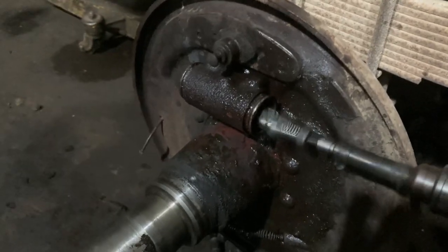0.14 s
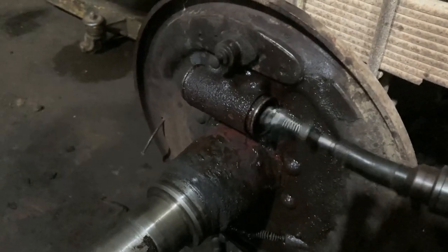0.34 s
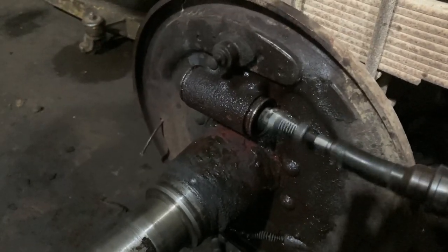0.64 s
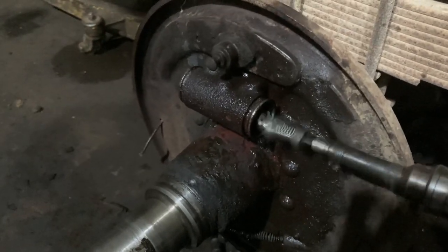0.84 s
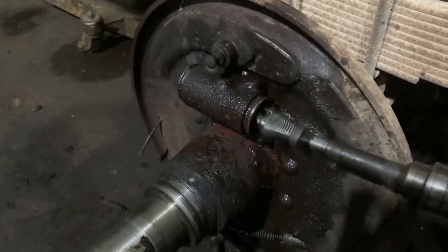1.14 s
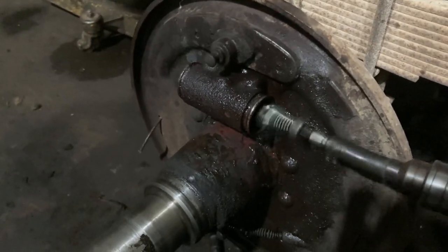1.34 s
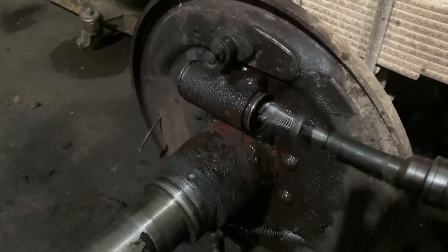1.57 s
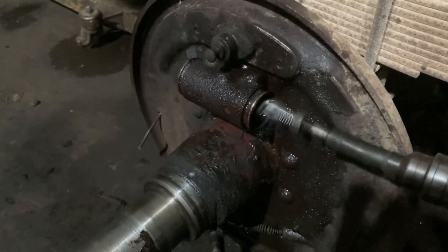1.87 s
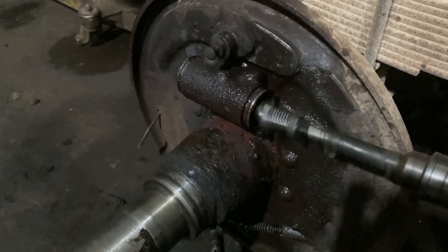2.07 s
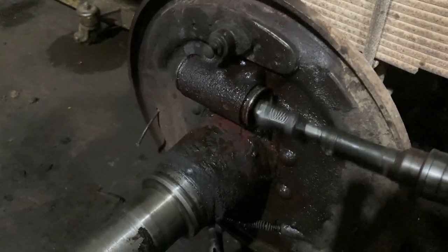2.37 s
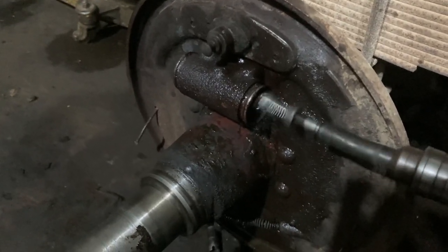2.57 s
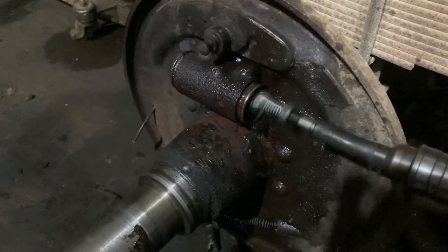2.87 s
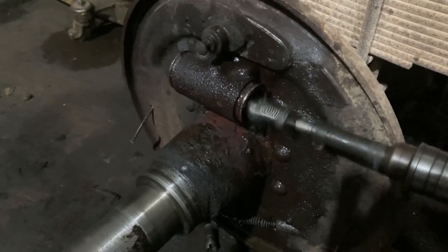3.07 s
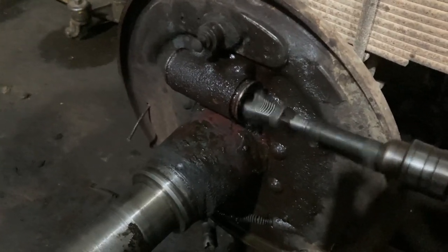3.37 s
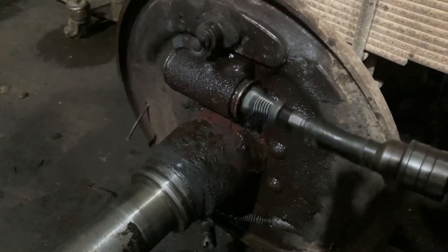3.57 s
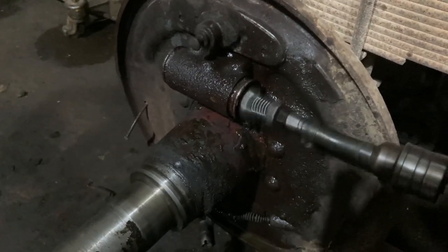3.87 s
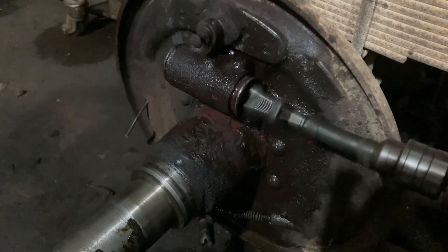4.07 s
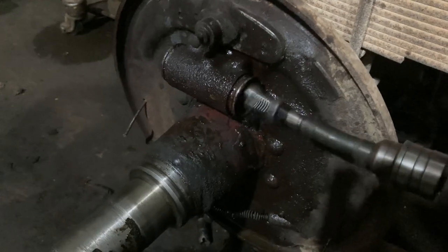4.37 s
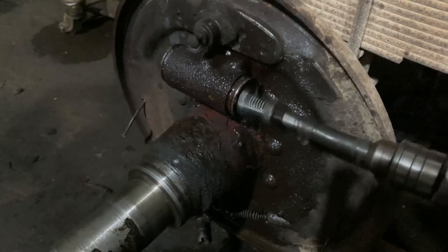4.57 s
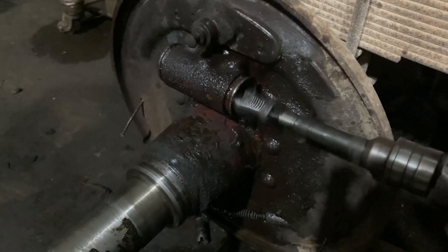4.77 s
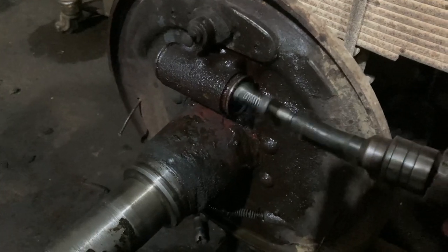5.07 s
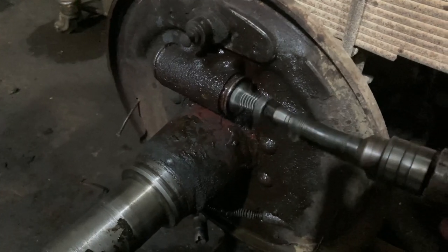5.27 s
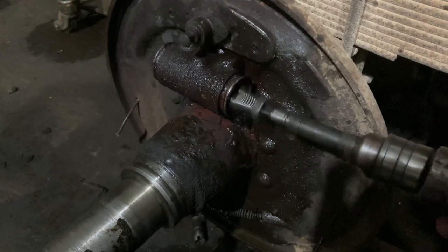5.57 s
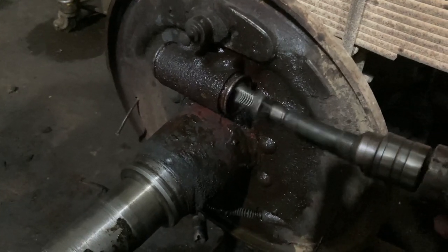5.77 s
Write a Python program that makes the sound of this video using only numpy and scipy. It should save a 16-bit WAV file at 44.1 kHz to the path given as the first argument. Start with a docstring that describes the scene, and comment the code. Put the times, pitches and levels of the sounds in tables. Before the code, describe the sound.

In a garage, a power drill spins a cleaning tool in a metal brake cylinder. A steady, buzzy whine around 1500 hertz sits over lower motor tones, rushing fan air and bright hiss. A faint crisp tick peaks just after one second. From about four seconds the brush catches and scrapes with short metallic chatter, busier after five. Close stereo microphone, dry, with the whine leaning left at first.

```python
"""Inside a metal brake cylinder a power drill spins a cleaning brush, close to a two-port microphone.
Motor: sines at multiples of rotor speed, which sags a little under load.
Fan, commutator and bristles: shaped stereo noise that rushes, hisses and fizzes.
Brush: noise bursts tick once a chuck turn; random slips and later catches ring the bore modes."""
import sys
import numpy as np
from scipy import signal
from scipy.fft import rfft, irfft, next_fast_len
from scipy.io import wavfile
from scipy.ndimage import map_coordinates

SR = 44100
rng = np.random.default_rng(int(sys.argv[2]) if len(sys.argv) > 2 else 0)


def wav_out(sig):
    """Save sig, one row per channel (or a flat mono array), as 16-bit PCM at SR to the path in sys.argv[1]."""
    wavfile.write(sys.argv[1], SR, np.round(np.clip(np.atleast_2d(sig).T, -1, 1) * 32767).astype(np.int16))


N = 260840

# rotor speed, sagging as the brush loads the motor: time_s, speed_hz
ROTOR_SPEED = [(0, 126.31), (0.25, 126.11), (0.42, 125.67), (0.68, 126.14), (0.9, 125.83), (1.12, 125.11),
               (1.25, 125.51), (1.37, 125.29), (1.5, 125.84), (1.75, 125.57), (1.88, 125.92), (2.0, 125.65),
               (2.12, 125.21), (2.31, 126.53), (2.52, 125.94), (2.63, 125.38), (2.95, 125.03),
               (3.03, 124.8), (3.13, 125.13), (3.4, 125.02), (3.52, 124.06), (3.8, 124.32), (3.87, 124.63),
               (3.98, 124.14), (4.08, 124.42), (4.2, 123.99), (4.42, 124.91), (4.6, 124.47), (4.77, 124.92),
               (5.0, 124.72), (5.33, 124.23), (5.55, 124.66), (5.68, 124.25), (5.91, 124.41)]
# main whine, 12 pulses a rotor turn: time_s, level_db, left_minus_right_db
WHINE_SWELL = [(0, -30, 8), (0.2, -29.5, 7), (0.42, -26.5, 6), (0.68, -28.5, 6), (1.05, -25, 2.1),
               (1.35, -25.2, 1.9), (1.55, -27, 5.5), (1.73, -26.2, 4.5), (1.92, -27.5, 6.5),
               (2.12, -25.5, 3.4), (2.31, -30.9, 7.6), (2.52, -28, 5), (2.68, -26, 3.1), (3.03, -26.7, 0.5),
               (3.4, -26.5, 0.7), (3.75, -26.5, 1), (4.2, -27, 1), (4.45, -26.5, 0.5), (5.0, -26.5, 0.2),
               (5.91, -26.5, 1)]
# strong motor partials at slow, usual and fast rotor speed: rotor_multiple, slow_db, usual_db, fast_db,
# slow_left_minus_right_db, fast_left_minus_right_db, left_lead_rad, waver_db
STRONG_PARTIALS = [(4, -34.5, -34, -36, -8.5, -4, 0.24, 0.16), (8, -37, -35, -36.5, -2.7, -1, 2.5, 0.76),
                   (16, -52.5, -55.5, -47, -3, 0, -1.92, 2), (20, -35, -33.5, -36, -3.5, 0.5, -2, 1.04),
                   (24, -38.5, -33, -37, .5, -2.9, 1.49, 0.99), (25, -53, -55, -49.5, -12.5, 4.5, -3, 3),
                   (28, -49.5, -49, -49.5, -9.5, -1.5, 3, 0.5), (33, -54, -54.5, -54, -3, 3.5, -1.5, 2.5),
                   (36, -46, -42, -48.5, 2, 21.5, 2.5, 1), (39, -62.6, -53, -47.5, 4.5, -1.5, -3, -0.5),
                   (40, -54, -53, -52, -7.5, 2.5, -2.5, 2), (41, -56, -57.5, -48, -2, -5, -4, -1),
                   (44, -48.5, -45.5, -49, -6.5, 1.9, -3, 2.7), (60, -62.5, -60.5, -52, -3, 1.5, 2.7, 4),
                   (80, -53.5, -56.5, -60.5, 0, -2.5, 1.5, 3)]
# faint motor partials, before the port response: rotor_multiple, level_db
FAINT_PARTIALS = [(1, -80), (2, -65.5), (3, -63.5), (6, -67.5), (9, -53.5), (11, -45), (13, -68.5),
                  (17, -56.5), (18, -63.5), (19, -47), (23, -51.5), (26, -57), (29, -57.5), (30, -59),
                  (31, -52), (32, -55), (35, -60.5), (42, -54.5), (45, -52), (48, -56), (49, -54.5),
                  (56, -60), (64, -51), (65, -55), (69, -54.5), (72, -57.5), (78, -53)]
# brush catching in the bore: time_s, level_db
BRUSH_CATCHES = [(3.9901, -34), (4.054, -36), (4.104, -39), (4.1562, -38), (4.285, -39), (4.3343, -37),
                 (4.3942, -38), (4.5139, -40), (4.531, -38), (4.7105, -38), (4.922, -38), (4.952, -44),
                 (5.001, -37), (5.05, -35), (5.098, -34), (5.128, -35), (5.2258, -38), (5.253, -33),
                 (5.3116, -29), (5.3785, -34), (5.427, -36), (5.4967, -31), (5.5486, -35)]
# cylinder modes before random detuning and scatter: freq_hz, level_db, t60_s
BORE_MODES = [(2010, 0, .045), (2090, -1, .035), (2240, -3, .02), (2650, -7, .015), (3480, -6, .025)]
# brush pressed against the bore: start_s, end_s, scrape_db
BRUSH_PRESSES = [(3.994, 4.547, -55), (4.953, 5.52, -52)]
# relative noise spectra of fan, commutator and bristles: freq_hz, level_db
FAN_SPECTRUM = [(25, -54), (60, -37), (120, -34), (170, -20), (210, -21.5), (300, -20), (450, -9.5),
                (570, -13.5), (635, -19.5), (715, -4), (790, -8.5), (950, -7.5), (1080, -5), (1350, 2.5),
                (1580, -1), (1750, 1), (1930, -10), (2200, -30)]
HISS_SPECTRUM = [(1500, -35), (1900, -17), (2050, -12), (2200, -15), (2350, -12), (2600, -7.5),
                 (2820, -14.5), (2980, -5), (3300, -12), (3530, -2), (3800, -2.5), (3950, -6), (4150, -2.5),
                 (4330, -4.5), (4520, 0), (4650, 2), (4820, .5), (5000, 1), (5400, -6), (5620, -1),
                 (5820, -4), (6000, -10), (6400, -10), (7300, -40)]
FIZZ_SPECTRUM = [(5400, -30), (6150, -9), (6900, -7.5), (7500, -2), (8200, .5), (9300, -1.5), (9950, 0),
                 (10900, -6.5), (11600, -5), (12600, -1), (13600, -6), (13900, -4.5), (14500, -13),
                 (15600, -10.5)]
# level balance of the ports: freq_hz, left_minus_right_db
PORT_BALANCE = [(100, -2), (420, -12), (570, -1), (780, -5), (980, -2), (1250, -16), (1440, -5), (1560, 4),
                (1700, -1), (2000, 0), (4320, 1), (4480, 10), (4720, 0)]
# phase between the ports: freq_hz, left_lead_rad
PORT_LEAD = [(450, 0), (620, -3.1), (950, -3), (1320, -6.7), (1450, -6.9), (1740, -9.4), (2380, -9.4),
             (2820, -3.2), (3000, -4.8), (3200, -3.1), (3950, -3.1), (4200, -2.1), (4620, 3.14),
             (7100, 3.14), (10500, .87), (11100, 0)]
# likeness of the noise at the ports: freq_hz, likeness (1 = identical)
PORT_LIKENESS = [(100, .86), (540, .7), (635, .92), (720, .6), (900, .82), (1400, .8), (1560, .55),
                 (1800, .93), (2000, .65), (2220, .95), (2560, .55), (2830, .8), (3060, .5), (3300, .97),
                 (3500, .88), (4200, .75), (4450, .4), (4700, .93), (4950, .9), (5200, .998), (5700, 1),
                 (7000, 1), (7600, .75), (10600, .7), (11500, .99)]

SLOW_HZ, USUAL_HZ, FAST_HZ = 124.2, 125.2, 126.3  # rotor speeds of the strong partials' levels
CHUCK_GEARING, IDLER_GEARING = 7.4, 2.907  # rotor turns per turn of the chuck, of the middle gear
HISS_DB, HISS_DB_PER_HZ, HISS_ROUGH_DB = -38.5, 1.3, 0.7  # at mean speed; rise with rotor speed; roughness
FIZZ_DB, FIZZ_ROUGH_DB = -39.5, 0.55
GRIP_DB_PER_S, LET_GO_DB_PER_S, LIGHT_TOUCH_DB = 69, 45, -65  # scrape build, fade, resting level
RIM_S, RIM_DB = 1.1974, -16  # hardest rim tick, before scatter and band filter
RIM_RISE_DB_PER_S, RIM_FALL_DB_PER_S = 102, 25
LOW_CUT_HZ, TOP_HZ = 55, 15750
HALF = np.array([[.5], [-.5]])  # splits a left-right difference over the ports


def amp(db):
    """Decibels to gain."""
    return 10 ** (np.asarray(db) / 20)


def unit(x):
    """Scale to rms 1."""
    return x / np.sqrt(np.mean(x ** 2) + 1e-20)


def along(points, hz):
    """Read (freq_hz, value) points on a log axis."""
    point_hz, value = np.transpose(points)
    return np.interp(np.log(hz + 1), np.log(point_hz + 1), value)


def curves(rows):
    """One value per sample for each column after the time."""
    time_s, *columns = np.transpose(rows)
    return [np.interp(np.arange(N) / SR, time_s, column) for column in columns]


def wobble(rate_hz):
    """Smooth random curve through rate_hz knots a second."""
    coarse_s = np.linspace(0, N / SR, 8192)
    knots = rng.standard_normal(4096)
    coarse = map_coordinates(knots, [coarse_s * rate_hz], mode="wrap")
    return np.interp(np.arange(N) / SR, coarse_s, coarse)


def swell(t_s, start_s, end_s, rise_db_per_s, fall_db_per_s):
    """Envelope in dB: rises to 0 at start_s, holds until end_s, then falls."""
    before_db = rise_db_per_s * np.maximum(start_s - t_s, 0)
    after_db = fall_db_per_s * np.maximum(t_s - end_s, 0)
    return -before_db - after_db


def filtered(x, response):
    """Apply a frequency response, given as a function of Hz."""
    size = next_fast_len(N + SR // 4)
    spectrum = rfft(x, size) * response(np.fft.rfftfreq(size, 1 / SR))
    return irfft(spectrum, size)[..., :N]


def ports(x):
    """Each frequency reaches the two ports with its own level and phase."""
    def response(hz):
        gain = amp(HALF * along(PORT_BALANCE, hz))
        return gain * np.exp(1j * HALF * along(PORT_LEAD, hz))
    return filtered(x, response)


def rush(spectrum):
    """Shaped stereo noise of rms 1; the mid-side mix sets its likeness at the ports."""
    def shape(hz):
        mix_rad = np.arccos(np.clip(along(PORT_LIKENESS, hz), -1, 1)) / 2
        return amp(along(spectrum, hz)) * [np.cos(mix_rad), np.sin(mix_rad)]
    mid, side = filtered(rng.standard_normal((2, N)), shape)
    return unit(ports(np.array([mid + side, mid - side])))


def rotor(drag=0.0014, jitter=0.001):
    """Rotor speed_hz and angle_rad; brush drag ripples the angle once per chuck turn."""
    speed_hz = curves(ROTOR_SPEED)[0]
    chuck_rad = 2 * np.pi * np.cumsum(speed_hz) / SR / CHUCK_GEARING
    drag_ripple = drag * (1 + 0.92 * wobble(1.0)) * np.sin(chuck_rad)
    ripple = drag_ripple + jitter * wobble(150)
    angle_rad = 2 * np.pi * np.cumsum(speed_hz * (1 + ripple)) / SR
    return speed_hz, angle_rad


def fan():
    """Fan air: noise with a slowly wavering level."""
    return amp(-41.0 + wobble(8.7) / 2) * rush(FAN_SPECTRUM)


def commutator(speed_hz, angle_rad):
    """Commutator hiss: noise modulated one and four times a rotor turn, louder with speed."""
    sparks = unit(1 + 0.023 * np.sin(angle_rad) + 0.045 * np.sin(4 * angle_rad))
    level_db = HISS_DB + HISS_DB_PER_HZ * (speed_hz - speed_hz.mean())
    rough_db = HISS_ROUGH_DB * (wobble(25) + wobble(120))
    return amp(level_db + rough_db) * sparks * rush(HISS_SPECTRUM)


def bristles(angle_rad):
    """Bristle fizz on the metal: rough noise throbbing once a chuck turn."""
    throb_db = 0.16 * np.sin(angle_rad / CHUCK_GEARING)
    rough_db = FIZZ_ROUGH_DB * (wobble(14) / 2 + wobble(150))
    return amp(FIZZ_DB + throb_db + rough_db) * rush(FIZZ_SPECTRUM)


def bore_ring(scatter_db, attack_s=0.0024, detune=0.012):
    """One cylinder ring; where the brush touches shifts the modes and their shares."""
    t_s = np.arange(SR // 8) / SR
    modes = 0
    for freq_hz, level_db, t60_s in BORE_MODES:
        decay = amp(level_db + scatter_db * rng.standard_normal() - 60 * t_s / t60_s)
        mode_hz = freq_hz * (1 + detune * rng.standard_normal())
        modes = modes + decay * np.sin(2 * np.pi * mode_hz * t_s)
    return (1 - np.exp(-t_s / attack_s)) * modes


def scrape(angle_rad, swing_db=4):
    """Dense little slips, strongest once a chuck turn and under pressure, ring the cylinder."""
    struck = rng.random(N) < 700 / SR  # 700 slips a second on average
    slips = struck * rng.standard_normal(N) * amp(swing_db * np.sin(angle_rad / CHUCK_GEARING))
    t_s = np.arange(N) / SR
    pressure = amp(LIGHT_TOUCH_DB)
    for start_s, end_s, scrape_db in BRUSH_PRESSES:
        press_db = swell(t_s, start_s, end_s, GRIP_DB_PER_S, LET_GO_DB_PER_S)
        pressure = pressure + amp(scrape_db + press_db)
    ringing = signal.fftconvolve(slips, bore_ring(scatter_db=-2))[:N]
    return pressure * unit(ringing)


def chatter():
    """Each harder catch of the brush rings the cylinder anew."""
    out = np.zeros(N + SR)
    for time_s, level_db in BRUSH_CATCHES:
        ring = amp(level_db) * bore_ring(scatter_db=3.0)
        out[round(time_s * SR):][:len(ring)] += ring
    return out[:N]


def strikes(rows):
    """One impulse for each (time_s, level_db) row."""
    out = np.zeros(N)
    for time_s, level_db in rows:
        out[round(time_s * SR)] = amp(level_db)
    return out


def ticks(angle_rad, t60_s=0.0067, bright_hz=12200, width_hz=1300, scatter_db=4.0):
    """Bristles flick over the rim once per chuck turn: short bright noise cracks."""
    turns = (angle_rad - angle_rad[round(RIM_S * SR)]) / (2 * np.pi * CHUCK_GEARING)
    times_s = np.flatnonzero(np.diff(np.floor(turns))) / SR
    levels_db = RIM_DB + swell(times_s, RIM_S, RIM_S, RIM_RISE_DB_PER_S, RIM_FALL_DB_PER_S)
    levels_db = levels_db + scatter_db * rng.standard_normal(len(times_s))
    decay = amp(-60 * np.arange(SR // 20) / SR / t60_s)
    envelope = signal.fftconvolve(strikes(zip(times_s, levels_db)), decay)[:N]
    bursts = envelope * rng.standard_normal(N)
    return filtered(bursts, lambda hz: np.exp(-.5 * ((hz - bright_hz) / width_hz) ** 2))


def buzz(angle_rad, waver_db=2.0):
    """The slightly uneven rotor adds faint, unsteady tones between the strong ones."""
    tones = 0
    for order, level_db in FAINT_PARTIALS:
        level = amp(level_db + waver_db * wobble(14))
        tones = tones + level * np.sin(round(order) * angle_rad + rng.uniform(0, 2 * np.pi))
    return ports(tones)


def partial(phase_rad, level_db, pan_db, lead_rad, waver_db):
    """One motor tone at the two ports, wavering in level and balance."""
    unrest = 0.74 * wobble(11) + 1.02 * wobble(50) + 0.85 * wobble(190)
    pan_db = pan_db + waver_db * wobble(30) / 2
    level = amp(level_db + waver_db * unrest + HALF * pan_db)
    return level * np.sqrt(2) * np.sin(phase_rad + HALF * lead_rad)


def gears(speed_hz, angle_rad, throb_share=0.42):
    """Slot and gear-tooth tones swell and pan as speed slides past the housing's resonances."""
    throb = throb_share * np.sin(angle_rad / CHUCK_GEARING)
    out = 0
    for order, slow_db, usual_db, fast_db, slow_pan_db, fast_pan_db, lead_rad, waver_db in STRONG_PARTIALS:
        level_db = np.interp(speed_hz, [SLOW_HZ, USUAL_HZ, FAST_HZ], [slow_db, usual_db, fast_db])
        level_db = level_db + waver_db * throb
        pan_db = np.interp(speed_hz, [SLOW_HZ, FAST_HZ], [slow_pan_db, fast_pan_db])
        out = out + partial(round(order) * angle_rad, level_db, pan_db, lead_rad, waver_db)
    return out


def whine(angle_rad, throb_db=0.07, idler_db=0.2):
    """Main whine, 12 pulses a rotor turn, throbbing with each chuck and middle-gear turn."""
    level_db, pan_db = curves(WHINE_SWELL)
    chuck_db = throb_db * np.sin(angle_rad / CHUCK_GEARING)
    middle_db = idler_db * np.sin(angle_rad / IDLER_GEARING)
    return partial(12 * angle_rad, level_db + chuck_db + middle_db, pan_db, lead_rad=-0.5, waver_db=0.35)


def scene():
    """Drill and brush in the bore, all driven by one rotor."""
    speed_hz, angle_rad = rotor()
    air = fan() + commutator(speed_hz, angle_rad) + bristles(angle_rad)
    brush = scrape(angle_rad) + chatter() + ticks(angle_rad)
    motor = buzz(angle_rad) + gears(speed_hz, angle_rad) + whine(angle_rad)
    return air + brush + motor


def record(dry):
    """Microphone band: second-order low cut, nothing from TOP_HZ up."""
    def response(hz):
        low_cut = hz ** 2 / np.hypot(hz ** 2, LOW_CUT_HZ ** 2)
        return low_cut * (hz < TOP_HZ)
    return filtered(dry, response)


dry = scene()
out = record(dry)
wav_out(out)
```